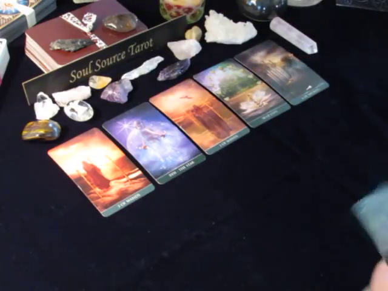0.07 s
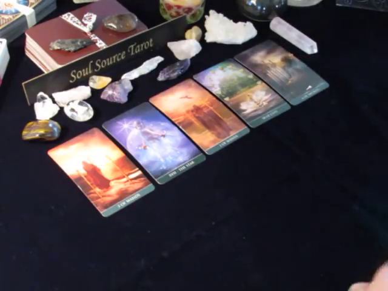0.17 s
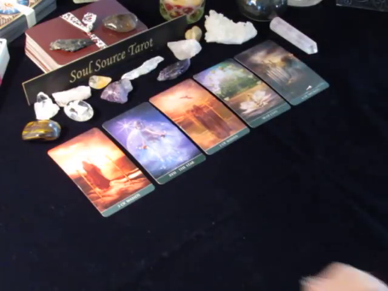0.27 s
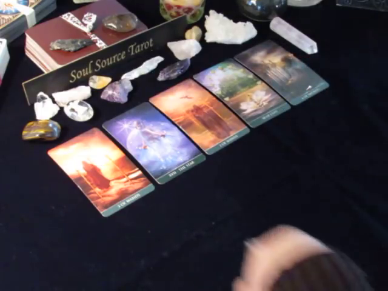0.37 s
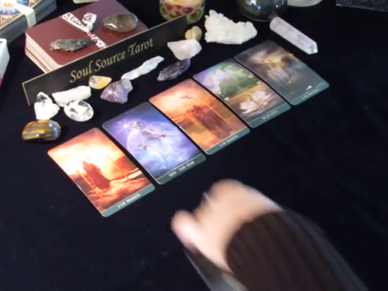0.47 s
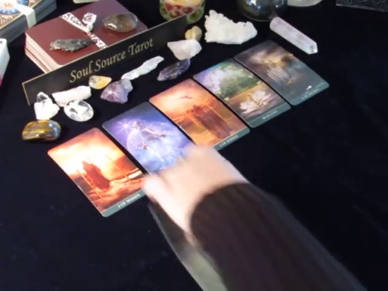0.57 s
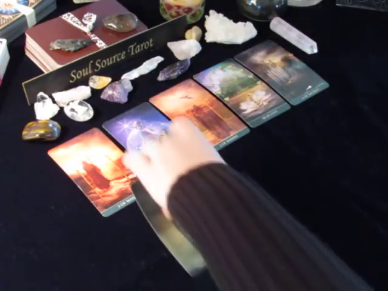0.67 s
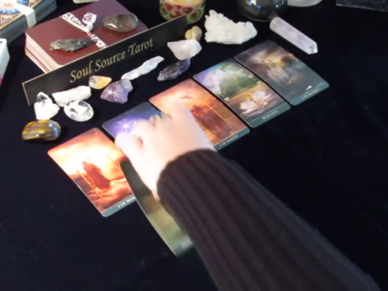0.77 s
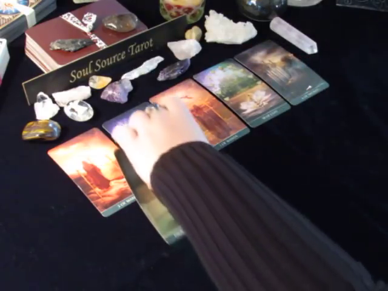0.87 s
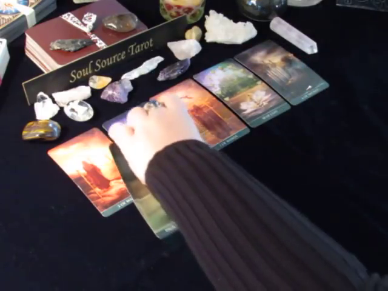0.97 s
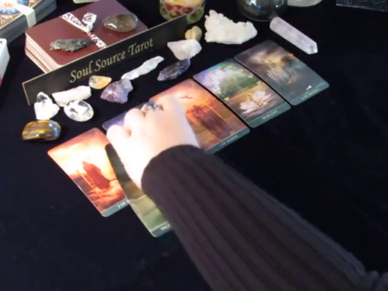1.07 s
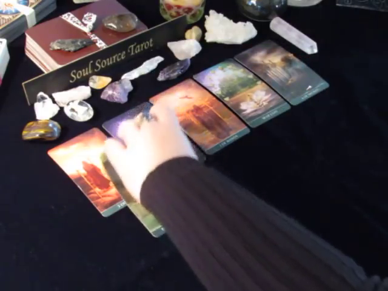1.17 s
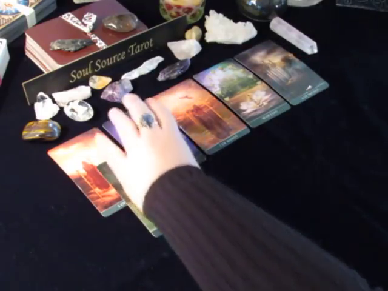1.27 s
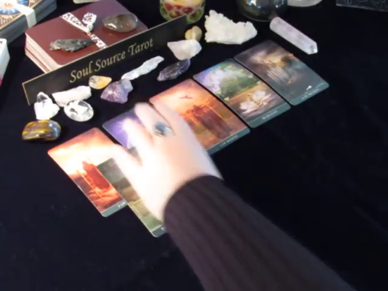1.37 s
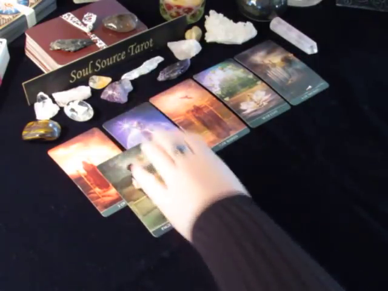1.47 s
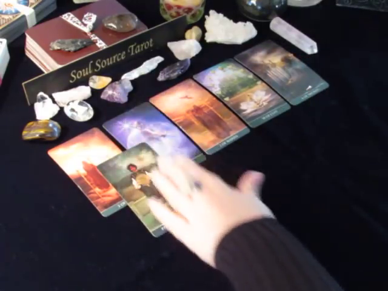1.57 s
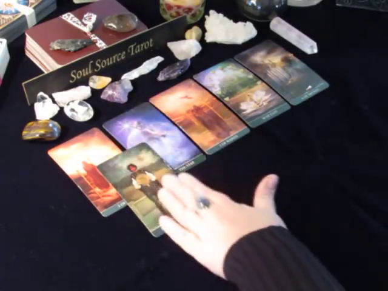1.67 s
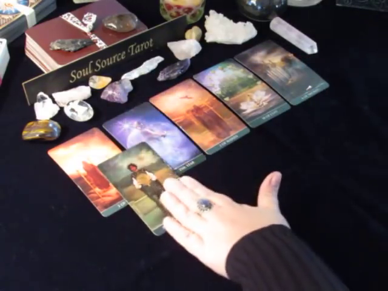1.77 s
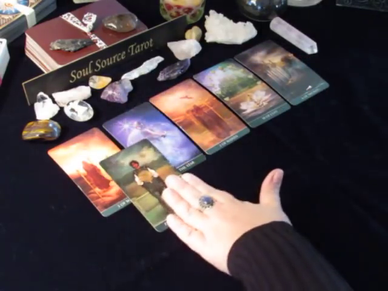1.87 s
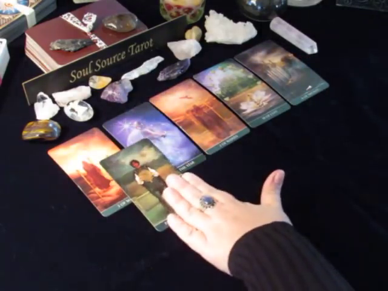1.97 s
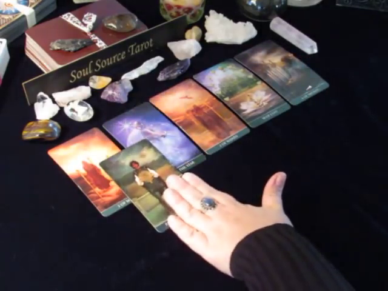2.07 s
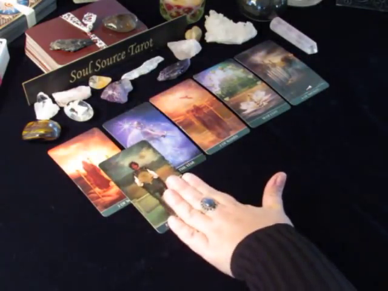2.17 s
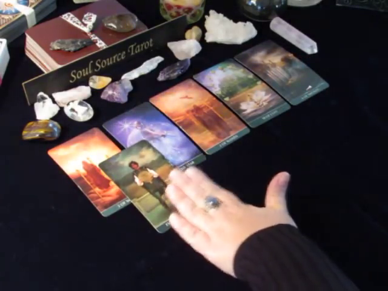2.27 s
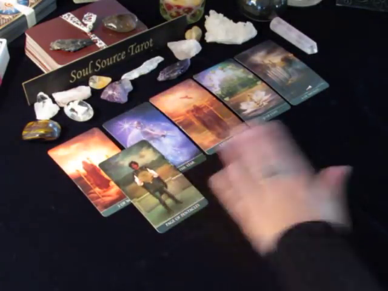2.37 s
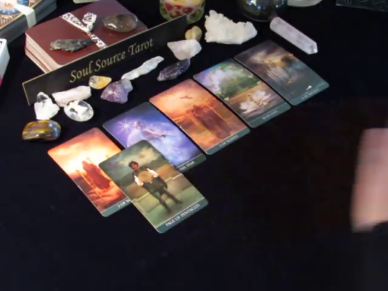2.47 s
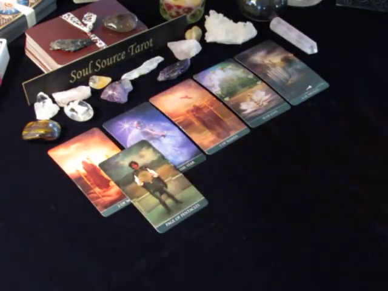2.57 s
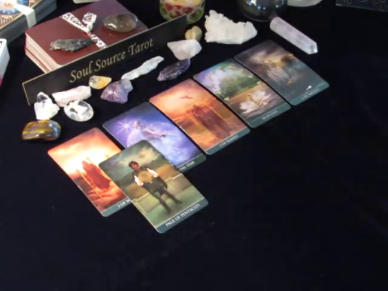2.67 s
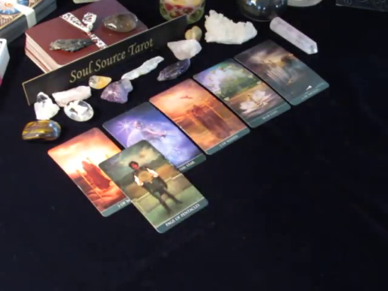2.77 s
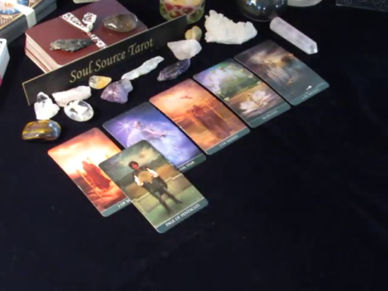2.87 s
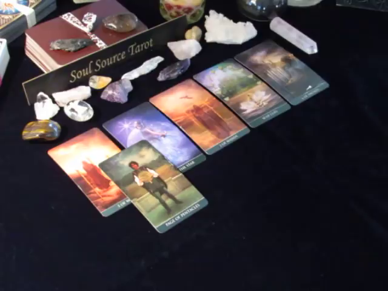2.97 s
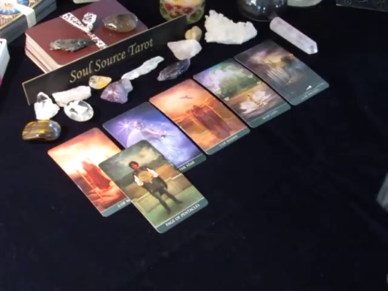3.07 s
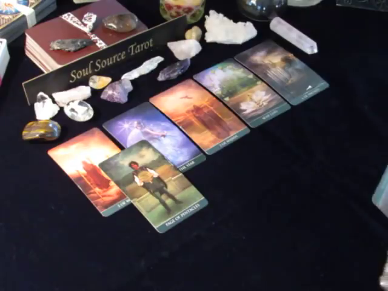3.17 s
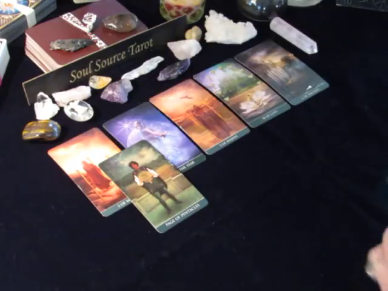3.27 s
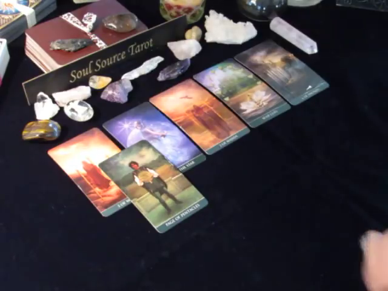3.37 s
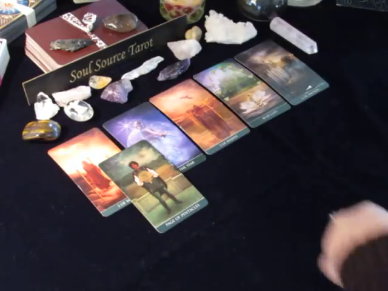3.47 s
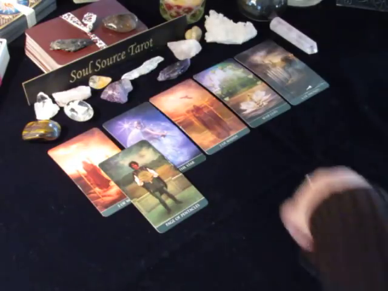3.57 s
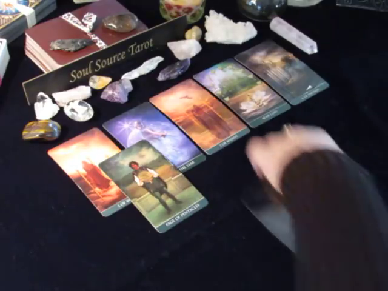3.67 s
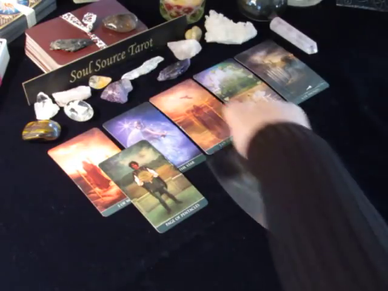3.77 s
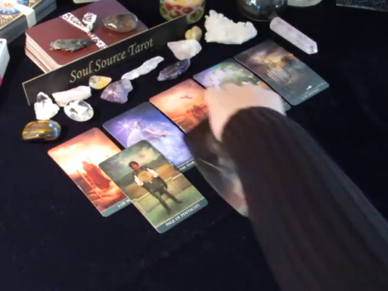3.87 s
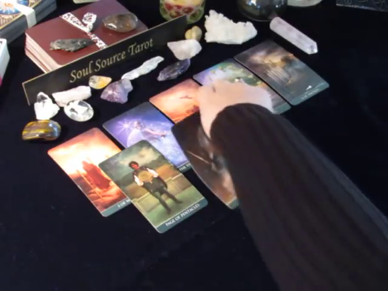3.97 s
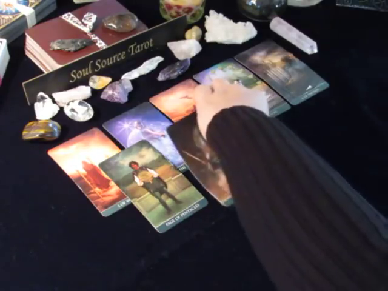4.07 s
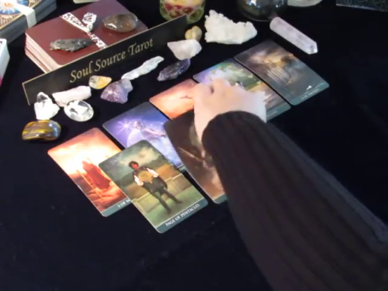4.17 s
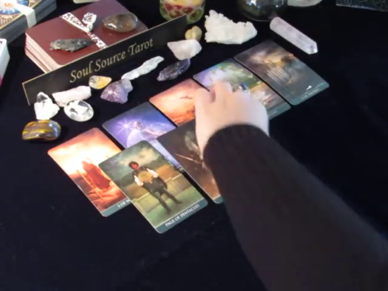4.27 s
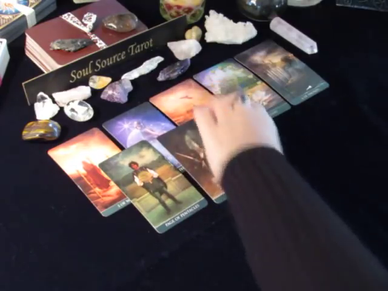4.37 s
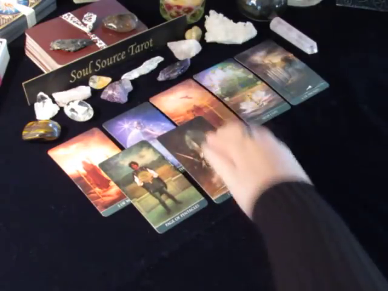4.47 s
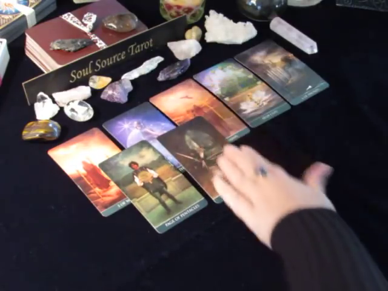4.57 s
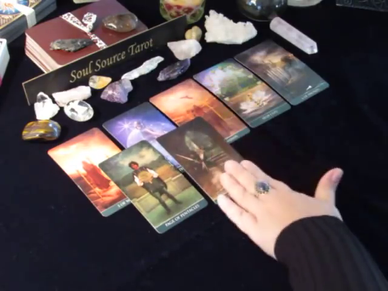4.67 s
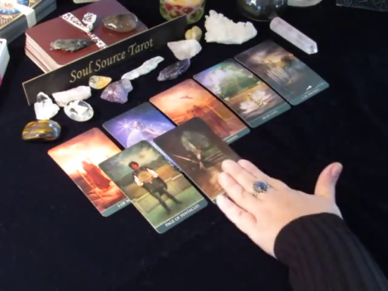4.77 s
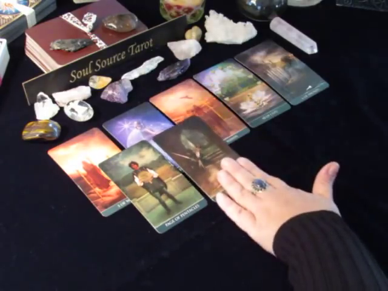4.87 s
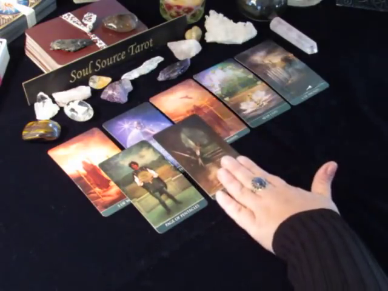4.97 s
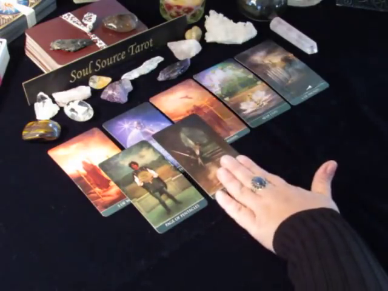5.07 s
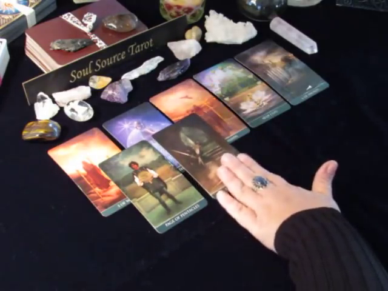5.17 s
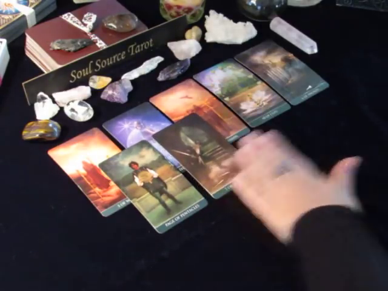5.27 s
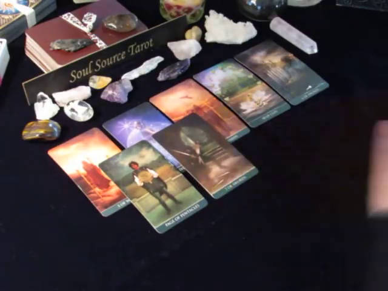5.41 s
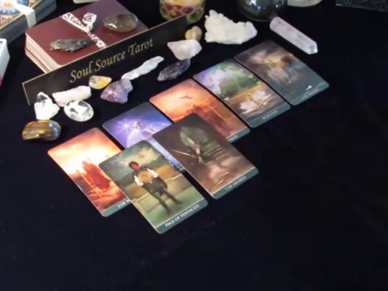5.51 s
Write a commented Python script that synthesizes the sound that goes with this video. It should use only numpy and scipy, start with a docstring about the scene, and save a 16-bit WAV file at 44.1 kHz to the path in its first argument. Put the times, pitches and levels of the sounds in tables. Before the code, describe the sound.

Close up in a small room, a card slides softly and snaps, another is flicked off the deck, slides and snaps; low fan drone throughout.

```python
"""Two stiff cards snap down on a cloth-covered table, close up in a small room: struck body, edge and thud.
Before each snap, card and sleeve swish over the cloth: shaped noise with a ringing bending mode.
In between, the next card is drawn and flicked off the deck, among light touches, faint ticks and rustle.
A fan and mains hum drone underneath as coloured noise and narrow tones.
The camera's gain drops when the level passes a ceiling, then creeps back."""
import sys
import numpy as np
from scipy import signal
from scipy.fft import rfft, irfft, next_fast_len
from scipy.io import wavfile
from scipy.ndimage import uniform_filter1d, minimum_filter1d

SR = 44100
rng = np.random.default_rng(int(sys.argv[2]) if len(sys.argv) > 2 else 0)


def master_out(mix):
    """Clip the mix to full scale and print it as 16-bit PCM to the path in sys.argv[1]."""
    frames = np.transpose(np.atleast_2d(mix))
    ceiling = np.clip(frames, -1, 1)
    pcm = np.round(ceiling * 32767).astype(np.int16)
    wavfile.write(sys.argv[1], SR, pcm)


N = 244314

# Levels are set ahead of the room, stereo balance and gain control.
# bent corners snapping down: [strike t/s, card body level/dB and edge crack level/dB before stage offsets,
# crack flutter against its first impact/dB, table thud level/dB, level at the end of the scrape before it/dB]
SNAPS = [(1.2588, -5, -14, -3, -8, -35.5), (4.2691, -7, 3.5, -11, -9, -35.5)]
# slip off the thumb, strike, rebound: [t from the strike/s, body offset/dB, crack offset/dB]
SNAP_STAGES = [(-0.0024, -0.5, -12.5), (0, -0.5, 0.5), (0.0062, -5.5, -14)]
# the next card drawn along the deck: [start t/s, end t/s, end level/dB, rise/dB, hiss against rub/dB]
DRAWS = [(2.839, 2.902, -68, 6.5, 7), (2.913, 2.968, -56, 16, -7)]
# card and sleeve sliding on cloth: [t at full speed/s, t when it slows/s, fibre hiss level/dB,
# rub level/dB, card ring level/dB, rise/dB per s, fall/dB per s]
SLIDES = [(0.554, 0.73, -53.5, -53, -53.5, 64, 57), (3.775, 3.883, -49, -47, -52, 74, 115)]
# the sliding card catches on the weave and sings: [t/s, f/Hz, level/dB, rise/dB per s, fall/dB per s]
CATCHES = [(0.485, 2224, -49, 350, 107), (0.638, 2050, -46.5, 500, 220), (0.792, 2170, -42.5, 4000, 450),
           (3.579, 2310, -53, 600, 220)]
# short brushes of the sleeve: [start t/s, length/s, rub level/dB, fibre hiss level/dB]
BRUSHES = [(0.309, 0.037, -50, -72), (0.358, 0.09, -55.5, -62), (0.897, 0.23, -68.5, -67.5),
           (3.445, 0.078, -59.5, -78), (3.55, 0.11, -60.5, -60)]
# the thumb lands on the deck: [t/s, level/dB, T60/s]
DECK_TAP = (2.673, -27.5, 0.069)
# the card comes free of the deck: [t/s, level/dB, T60/s]
FLICK = (2.9496, -12.5, 0.049)
# modes ringing on in the flicked card: [f/Hz, level against the burst before deck colour/dB, T60/s]
FLICK_MODES = [(1720, -19.5, 0.1), (4020, -22, 0.2), (4140, -24, .2), (6300, -18, 0.17)]
# light touches of fingers and card: [t/s, body level/dB, crack level/dB, T60/s]
TOUCHES = [(0.198, -29, -36.5, 0.2), (0.306, -31, -45, .12), (0.791, -19.5, -42, 0.025),
           (3.349, -37.5, -41, .1), (4.102, -24.5, -49, 0.092), (4.714, -33, -41, 0.12)]
# the hand rests on the table: [from t/s, until t/s]
RESTING = (1.38, 2.65)

# colour of the card's body: [f/Hz, relative level/dB per Hz]
CARD_COLOUR = [(100, -11), (400, -6), (680, -30), (990, -3), (1300, -3.5), (1750, -2.5), (2150, 2.5),
               (3100, -6.5), (5500, -9.5), (9000, -13), (15000, -27)]
# colour of the hard card edge: [f/Hz, relative level/dB per Hz]
CRACK_COLOUR = [(500, -12.5), (3000, -17.5), (6000, -8.5), (9700, -2.5), (14500, -5), (16000, -24),
                (18000, -53)]
# colour of the padded table: [f/Hz, relative level/dB per Hz]
THUD_COLOUR = [(20, -47), (40, -31), (125, 1), (270, 6.5), (480, -10), (700, -16), (2000, -14)]
# colour of rubbing on cloth: [f/Hz, relative level/dB per Hz]
RUB_COLOUR = [(300, -16), (700, -15), (1000, 3), (1350, 5), (1800, 3), (2600, 1), (3200, -20), (6000, -23),
              (15000, -36)]
# colour of hissing fibres: [f/Hz, relative level/dB per Hz]
HISS_COLOUR = [(1000, -7), (2800, 6.5), (4200, 3.5), (6000, 1.5), (10000, 0.5), (12500, -1), (15000, -4.5),
               (15500, -30)]
# colour of the deck held in the hand: [f/Hz, relative level/dB per Hz]
DECK_COLOUR = [(30, -22), (100, -2), (350, 1.5), (700, 0), (950, 3), (1700, -0.5), (2700, -0.5),
               (3450, -7.5), (4100, -6.5), (5000, -12.5), (10700, -8.5), (12500, -16), (15000, -24)]
# colour of small dull contacts: [f/Hz, relative level/dB per Hz]
TICK_COLOUR = [(400, -30), (1000, 0), (1500, 5), (2300, 1), (2800, -1), (3600, -10.5), (12000, -30)]

# drone colour in the middle: [f/Hz, relative level/dB per Hz]
DRONE_MID = [(20, -32), (40, -18), (90, -9), (180, -9), (400, -14), (570, -22.5), (670, -25), (900, -20),
             (1500, -25), (2200, -31), (2700, -29), (3700, -35), (10000, -35), (15000, -40)]
# drone colour at the sides: [f/Hz, relative level/dB per Hz]
DRONE_SIDE = [(20, -17), (40, -1.5), (95, -1.5), (200, -1.5), (400, -6), (540, -11), (670, -24),
              (900, -16.5), (1350, -21), (2300, -33.5), (2800, -34), (3600, -39.5), (10000, -36),
              (15000, -42)]
# narrow fan and mains tones: [f/Hz, width/Hz, middle level/dB, side level/dB]
HUM = [(120.8, 3.4, -66, -87), (165, 22, -73.5, -58), (246.9, 5.4, -68.5, -85), (457, 16.3, -60.5, -67),
       (503, 38, -59.5, -62.5), (550.8, 22.4, -62.5, -74)]
# decay of the room: [f/Hz, T60/s]
ROOM = [(150, 0.21), (600, 0.34), (2000, 0.37), (6000, 0.29), (13000, 0.16)]

THUD_LEAD_S, THUD_T60_S = 0.005, 0.085  # the finger meets the table just before the strike
# the corner drags over the thumb before the snap; its hiss is set against the rub
SCRAPE_S, SCRAPE_LEAD_S, SCRAPE_RISE_DB, SCRAPE_HISS_DB = 0.031, 0.0043, 34.5, -11
RUB_RISE_DB_PER_S, RUB_FALL_DB_PER_S = 115, 70
RUB_LEAD_S, RING_LAG_S = 0.012, 0.0068  # rub peak before full speed, ring peak after slowing begins
RING_HZ, RING_WIDTH_HZ = 2186, 390  # the card's bending mode
RING_STEEPER = 1.18  # ring slopes over hiss slopes
CATCH_WIDTH_HZ = 370
# the flick slips one gap earlier and rebounds one gap later
FLICK_GAP_S, FLICK_SLIP_DB, FLICK_REBOUND_DB = 0.007, -1.5, -3.5
TICK_START_S, TICK_PERIOD_S = 1.457, 0.0658
TICK_DB, TICK_SCATTER_DB = -37.5, 1.5  # average level and its spread
TOP_HZ, NOISE_TOP_HZ = 15900, 15100  # band limits of the output and of the coloured noise


def snaps():
    """Each snap knocks the padded table and drives the card's body and hard edge at every stage."""
    body, edge, table = np.zeros((3, N))
    for s, body_db, crack_db, flutter_db, thud_db, _ in SNAPS:
        add(table, s - THUD_LEAD_S, amp(thud_db) * blow(flutter_db=7, t60=THUD_T60_S))
        for delay, stage_body_db, stage_crack_db in SNAP_STAGES:
            body_blow = blow(flutter_db=11.5, t60=0.033)
            edge_blow = blow(flutter_db, t60=0.0075)
            add(body, s + delay, amp(body_db + stage_body_db) * body_blow)
            add(edge, s + delay, amp(crack_db + stage_crack_db) * edge_blow)
    return struck(body, CARD_COLOUR) + struck(edge, CRACK_COLOUR) + struck(table, THUD_COLOUR)


def scrapes():
    """Friction swells as a bent card nears its release from the thumb or the deck."""
    t, out = np.arange(N) / SR, np.zeros(N)
    rub = noise(CARD_COLOUR, grain_db=5)
    hiss = noise(HISS_COLOUR, grain_db=3)
    corners = []
    for s, *_, db in SNAPS:
        end = s - SCRAPE_LEAD_S
        corners.append((end - SCRAPE_S, end, db, SCRAPE_RISE_DB, SCRAPE_HISS_DB))
    for start, end, db, rise_db, hiss_db in corners + DRAWS:
        sounding = (t >= start) * (t < end)
        level = amp(db + np.interp(t, [start, end], [-rise_db, 0])) * sounding
        out += level * (rub + amp(hiss_db) * hiss)
    return out


def slides():
    """The weave hisses through each stroke; rub peaks near full speed, the bending mode as it slows."""
    rub = patchy(noise(RUB_COLOUR, grain_db=4), depth_db=2.2)
    hiss = noise(HISS_COLOUR, grain_db=2.5)
    ring = narrow(RING_HZ, RING_WIDTH_HZ)
    out = np.zeros(N)
    for fast, slow, hiss_db, rub_db, ring_db, rise_db, fall_db in SLIDES:
        rub_peak, ring_peak = fast - RUB_LEAD_S, slow + RING_LAG_S
        ring_rise, ring_fall = RING_STEEPER * rise_db, RING_STEEPER * fall_db
        out += amp(hiss_db) * hiss * swell(fast, slow, rise_db, fall_db)
        out += amp(rub_db) * rub * swell(rub_peak, rub_peak, RUB_RISE_DB_PER_S, RUB_FALL_DB_PER_S)
        out += amp(ring_db) * ring * swell(ring_peak, ring_peak, ring_rise, ring_fall)
    return out


def catches():
    """Each catch on the weave excites the card's bending mode at its own pitch."""
    out = np.zeros(N)
    for s, hz, db, rise_db, fall_db in CATCHES:
        out += amp(db) * narrow(hz, CATCH_WIDTH_HZ) * swell(s, s, rise_db, fall_db)
    return out


def brushes():
    """The sleeve grazes the cloth in short rounded strokes of rub and fibre hiss."""
    t, out = np.arange(N) / SR, np.zeros(N)
    rub = noise(RUB_COLOUR, grain_db=4)
    hiss = noise(HISS_COLOUR, grain_db=3)
    for start, length, rub_db, hiss_db in BRUSHES:
        part = np.clip((t - start) / length, 0, 1)
        stroke = 2 * np.sqrt(part * (1 - part))  # half ellipse
        out += stroke * (amp(rub_db) * rub + amp(hiss_db) * hiss)
    return out


def deck():
    """The thumb taps the deck, then a card slips, flicks free and rebounds, all coloured by the deck."""
    blows = np.zeros(N)
    s, db, t60 = DECK_TAP
    add(blows, s, amp(db) * chatter(t60))
    s, db, t60 = FLICK
    stages = [(-FLICK_GAP_S, FLICK_SLIP_DB), (0, 0), (FLICK_GAP_S, FLICK_REBOUND_DB)]
    for delay, stage_db in stages:
        add(blows, s + delay, amp(db + stage_db) * flick(t60))
    return struck(blows, DECK_COLOUR)


def flick(t60):
    """A burst of edge friction with a few modes of the card ringing on."""
    t, burst = np.arange(SR // 4) / SR, chatter(t60)
    for hz, db, ring_t60 in FLICK_MODES:
        decay = np.exp(-np.log(1000) * t / ring_t60)
        mode = np.sin(2 * np.pi * (hz * t + rng.random())) * decay
        burst = burst + amp(db) * mode / np.linalg.norm(mode)
    return burst


def touches():
    """Fingers and card meet lightly: a dull tick with a little edge."""
    body, edge = np.zeros((2, N))
    for s, body_db, crack_db, t60 in TOUCHES:
        add(body, s, amp(body_db) * chatter(t60))
        add(edge, s, amp(crack_db) * chatter(t60))
    return struck(body, TICK_COLOUR) + struck(edge, CRACK_COLOUR)


def ticking(count):
    """An evenly timed run of faint ticks of uneven strength while the hand rests."""
    blows = np.zeros(N)
    for k, scatter in enumerate(rng.standard_normal(count)):
        tick = amp(TICK_DB + TICK_SCATTER_DB * scatter) * blow(flutter_db=8, t60=.03)
        add(blows, TICK_START_S + k * TICK_PERIOD_S, tick)
    return struck(blows, TICK_COLOUR)


def rustle(start, end, db, per_second):
    """The resting hand shifts, and single fibres catch and let go at random."""
    t = np.arange(N) / SR
    happens = (rng.random(N) < per_second / SR) * (t > start) * (t < end)
    pushes = happens * rng.standard_normal(N)
    fluttering = signal.fftconvolve(pushes, blow(flutter_db=18, t60=0.018))[:N]
    return amp(db) * struck(fluttering, TICK_COLOUR)


def drone():
    """Fan rush, largely out of step at the two microphone ports, with narrow hum tones."""
    mid, side = amp(-57) * noise(DRONE_MID), amp(-48) * noise(DRONE_SIDE)
    for hz, width_hz, mid_db, side_db in HUM:
        mid += amp(mid_db) * narrow(hz, width_hz)
        side += amp(side_db) * narrow(hz, width_hz)
    return np.array([mid + side, mid - side])


def room(x, wet_db, side_db, delay):
    """The room's short answer: noise dying at a rate set by frequency, its width also set by frequency."""
    hz, t, z = signal.stft(rng.standard_normal((2, SR // 2)), SR, nperseg=256)
    decay = np.exp(-np.log(1000) * t / along(ROOM, hz)[:, None])
    tail = signal.istft(z * decay, SR, nperseg=256)[1]
    tail = np.pad(tail / np.linalg.norm(tail[0]), ((0, 0), (round(abs(delay) * SR), 0)))
    wet = signal.fftconvolve(x[None], tail, axes=1)[:, :N]
    # (f/Hz, offset/dB): tone of the whole answer, then extra tone of its sides
    tone = [(300, 6), (2200, 0.0), (5000, -2.0), (12000, -7)]
    width = [(300, -5), (1000, 6), (2200, -46), (5000, -6), (11000, 18.5)]
    mid, side = filtered(wet, lambda f: amp(wet_db + along(tone, f)))
    side = filtered(side, lambda f: amp(side_db + along(width, f)))
    return np.array([mid + side, mid - side])


def blow(flutter_db, t60):
    """One clean impact and the flutter that follows it, scaled to energy 1."""
    push = amp(flutter_db) * chatter(t60)
    push[0] = 1
    return push / np.linalg.norm(push)


def chatter(t60):
    """A dying run of tiny contacts, energy 1."""
    t = np.arange(SR // 4) / SR
    run = rng.standard_normal(len(t)) * np.exp(-np.log(1000) * t / t60)
    return run / np.linalg.norm(run)


def struck(blows, colour, size=2048):
    """Blows through a causal body of the given colour and energy 1."""
    cepstrum = irfft(np.log(amp(along(colour, np.fft.rfftfreq(size, 1 / SR)))))
    # folding the cepstrum gives minimum phase: no sound before the blow
    cepstrum[1:size // 2] *= 2
    cepstrum[size // 2 + 1:] = 0
    response = irfft(np.exp(rfft(cepstrum)))
    return signal.fftconvolve(blows, response / np.linalg.norm(response))[:N]


def noise(colour, grain_db=0):
    """Coloured noise of rms 1; grain_db scatters the sizes of its tiny impacts."""
    grains = rng.standard_normal(N) * amp(grain_db * rng.standard_normal(N))
    return unit(filtered(grains, lambda hz: amp(along(colour, hz)) * (hz < NOISE_TOP_HZ)))


def narrow(centre_hz, width_hz):
    """Noise of rms 1 in one resonance, width_hz wide at half its peak gain."""
    def resonance(hz):
        """Gain falling away on both sides of the centre."""
        return 1 / (1 + ((hz - centre_hz) / width_hz * 2) ** 2)
    return unit(filtered(rng.standard_normal(N), resonance))


def patchy(x, depth_db):
    """Uneven pressure lifts and drops bands of a rubbing sound from moment to moment."""
    z = signal.stft(x, nperseg=512)[2]
    field = uniform_filter1d(rng.standard_normal(z.shape), size=6, axis=0)  # smooth over frequency
    field = uniform_filter1d(field, size=7, axis=1)  # smooth over time
    return unit(signal.istft(z * amp(depth_db * unit(field)), nperseg=512)[1][:N])


def swell(top, leave, rise_db, fall_db):
    """Gain that climbs by rise_db a second until top, holds until leave and falls by fall_db a second."""
    t = np.arange(N) / SR
    return amp(-rise_db * np.maximum(top - t, 0) - fall_db * np.maximum(t - leave, 0))


def add(track, s, sound):
    """Mix a sound into a track at time s."""
    start = round(s * SR)
    track[start:start + len(sound)] += sound[:N - start]


def filtered(x, response):
    """Shape x by a gain that depends on frequency."""
    m = next_fast_len(N + SR // 2)
    return irfft(rfft(x, m) * response(np.fft.rfftfreq(m, 1 / SR)), m)[..., :N]


def along(points, hz):
    """Read (f/Hz, value) points on a log frequency axis."""
    f, v = np.transpose(points)
    return np.interp(np.log(hz + 1), np.log(f + 1), v)


def unit(x):
    """Scale to rms 1."""
    return x / np.sqrt(np.mean(x ** 2) + 1e-20)


def amp(db):
    """Decibels to gain."""
    return 10 ** (np.asarray(db) / 20)


def gain_control(x, ceiling_db, release_db, size=256):
    """Gain drops when the short-term level passes the ceiling and creeps back by release_db a second."""
    power = np.abs(uniform_filter1d(np.mean(x ** 2, axis=0), size))
    over = np.maximum(10 * np.log10(power + 1e-12) - ceiling_db, 0)
    creep = release_db * np.arange(N) / SR
    cut = np.maximum.accumulate(over + creep) - creep
    return x * amp(uniform_filter1d(minimum_filter1d(-cut, size), size))


def scene():
    """Card impacts sit a hair to the left, swish and drone a hair to the right, in one small room."""
    cards = snaps() + scrapes() + deck() + touches() + ticking(count=17)
    cards = cards + rustle(*RESTING, db=-48, per_second=130)
    swish = slides() + catches() + brushes()
    near = cards + room(cards, wet_db=-8.5, side_db=-12.0, delay=.004)
    soft = swish + room(swish, wet_db=-6.0, side_db=-11.0, delay=.004)
    return near * amp([[.2], [-.2]]) + (soft + drone()) * amp([[-.4], [.4]])


def record(dry):
    """The camera holds down peaks and keeps nothing above its band limit."""
    held = gain_control(dry, ceiling_db=-22.1, release_db=4)
    return filtered(held, lambda hz: hz < TOP_HZ)


dry = scene()
out = record(dry)
master_out(out)
```